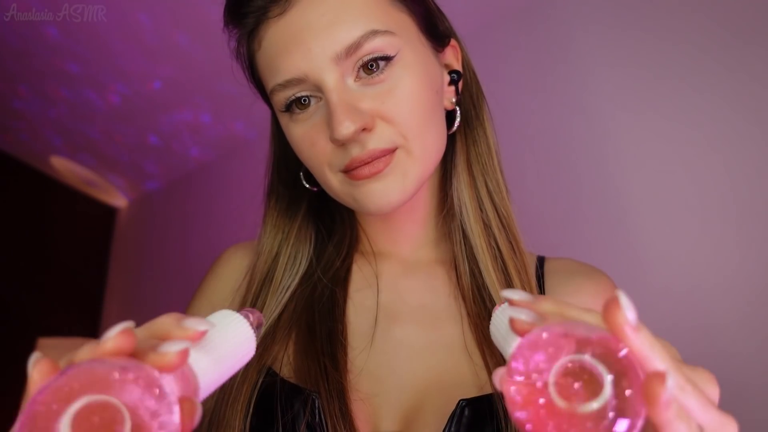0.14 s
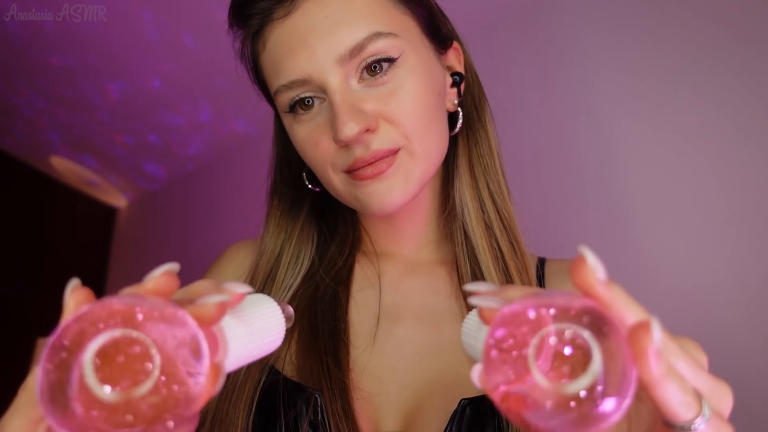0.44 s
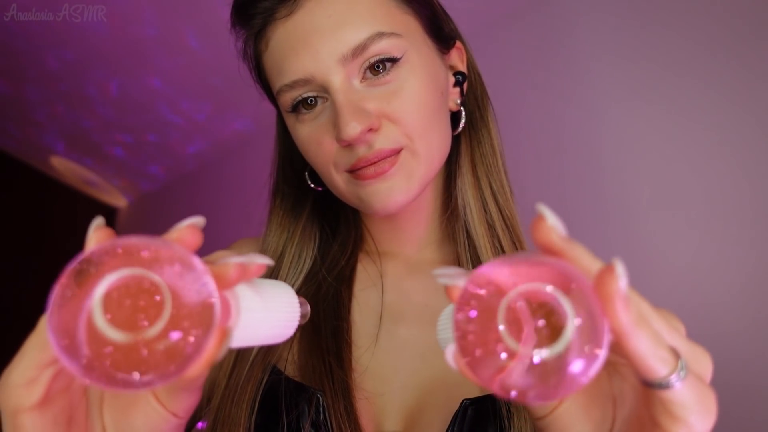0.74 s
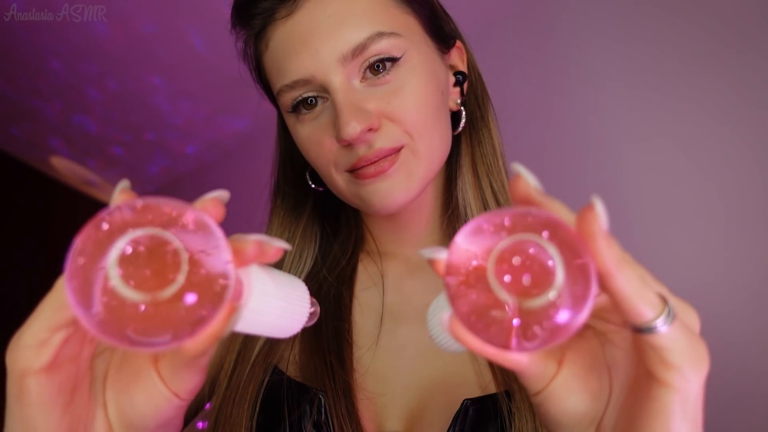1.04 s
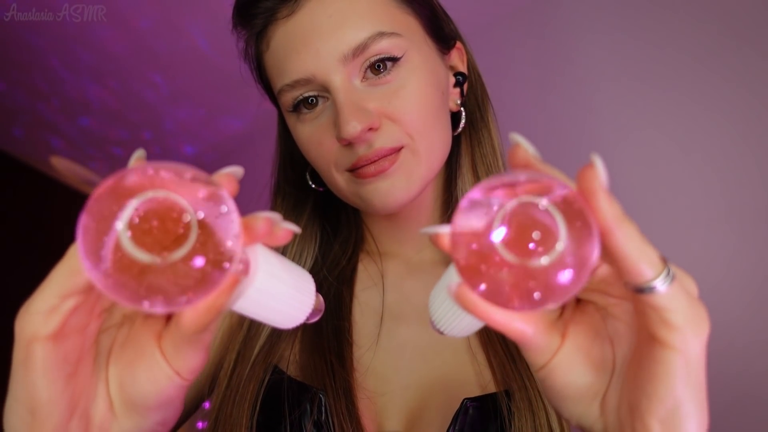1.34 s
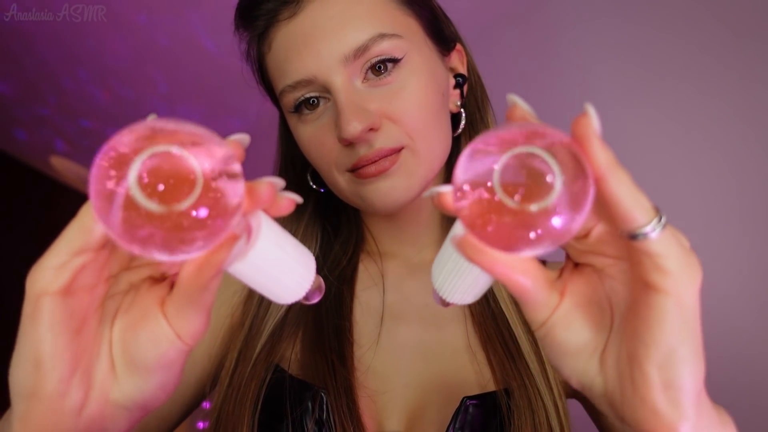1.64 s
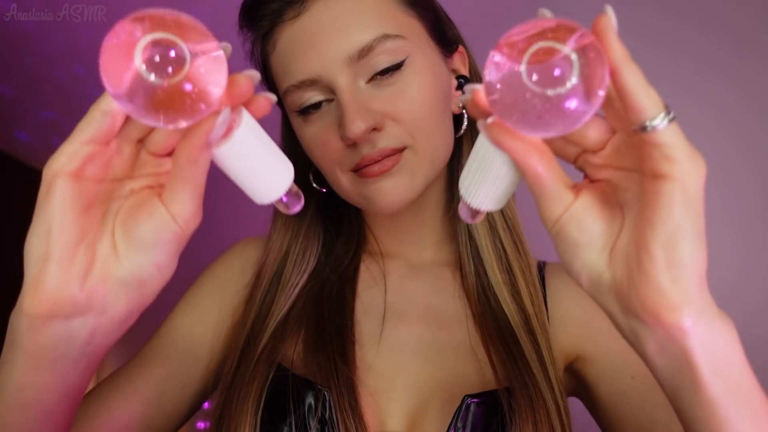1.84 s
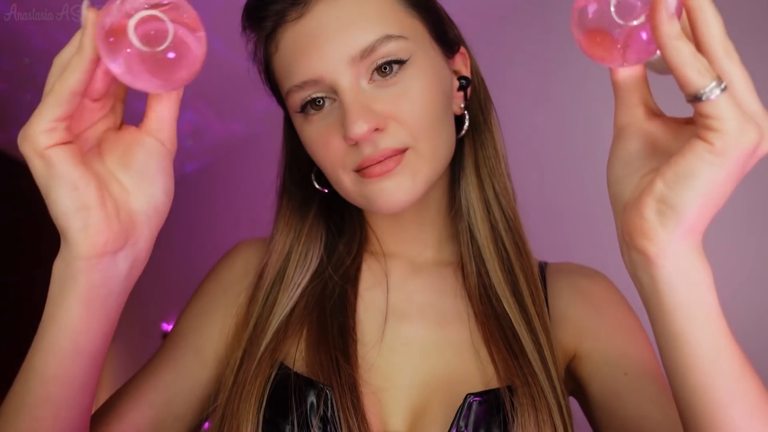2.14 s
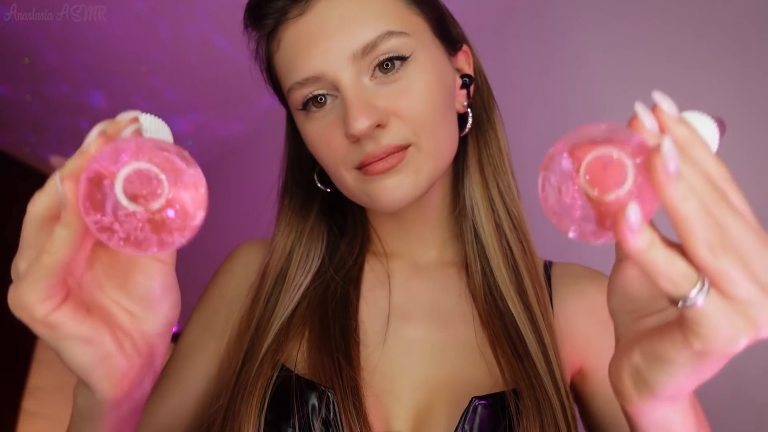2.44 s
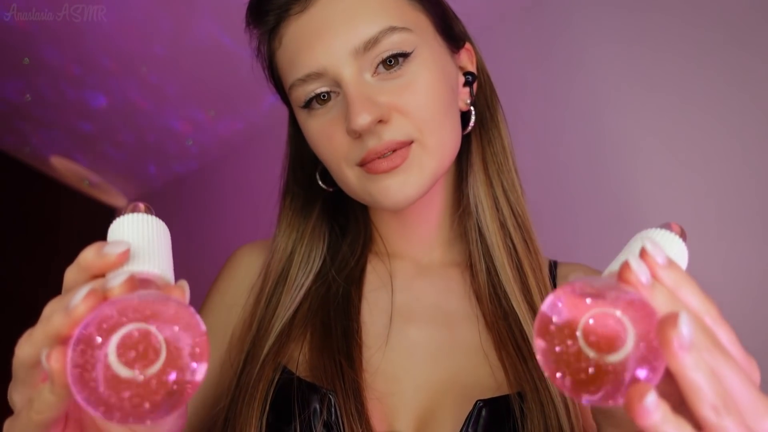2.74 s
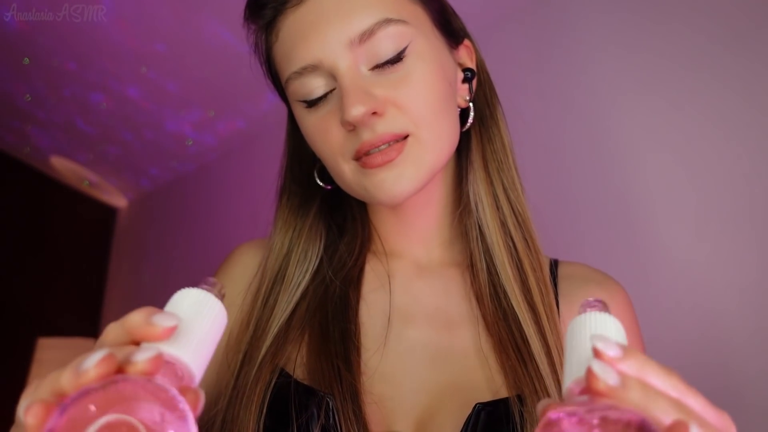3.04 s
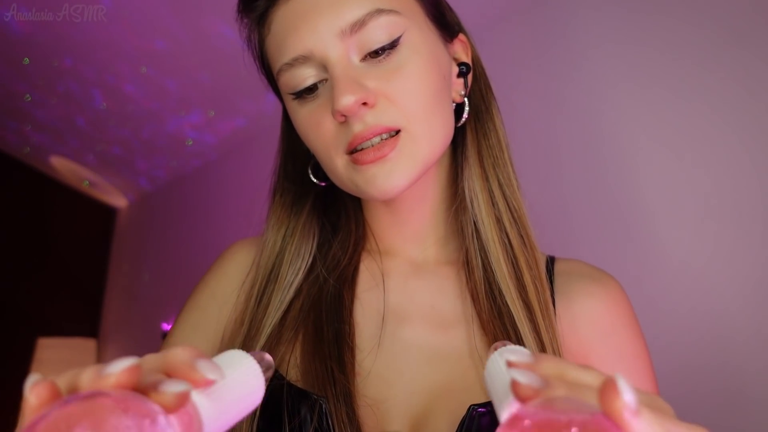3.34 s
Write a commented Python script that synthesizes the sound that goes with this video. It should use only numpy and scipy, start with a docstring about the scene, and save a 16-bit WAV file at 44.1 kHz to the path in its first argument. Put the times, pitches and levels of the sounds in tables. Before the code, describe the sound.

Close to a stereo microphone in a quiet room, liquid in two handheld glass globes gives a few quick gulps, then a brief bubbly trickle. Light finger ticks and taps come before and after, over a low rumble and faint hum.

```python
"""Four glugs, then small plinking bubbles, from two liquid-filled glass globes tipped and turned back.
Each gulp of air through a neck rings a large pocket and a smaller one that chirps upward.
Fingers tick, tap and rub on the glass, close to a stereo microphone in a quiet room.
Moving arms stir a deep rumble over mains hum and hiss; a faint tone wavers near the end."""
import sys
import numpy as np
from scipy import signal
from scipy.fft import rfft, irfft, next_fast_len
from scipy.io import wavfile
from scipy.ndimage import map_coordinates

SR = 44100
rng = np.random.default_rng(int(sys.argv[2]) if len(sys.argv) > 2 else 0)


def generate_wav(sig):
    """Save sig (samples, or channels by samples) to the path in sys.argv[1] as 16-bit PCM at SR."""
    pcm = np.round(np.clip(np.atleast_2d(sig).T, -1, 1) * 32767).astype(np.int16)
    wavfile.write(sys.argv[1], SR, pcm)


N = 154350

# spectrum of skin on glass (frequency [Hz], gain [dB])
SKIN_SPECTRUM = [(1000, -40), (5000, -20), (8000, -9.5), (10500, -2.5), (15000, -3), (17000, -17)]
BUBBLE_ATTACK_S, BUBBLE_WET_DB = 0.00024, -8


def amp(db):
    """Decibels to gain."""
    return 10 ** (np.asarray(db) / 20)


def along(points, hz):
    """Interpolate (Hz, value) points on a log axis."""
    knots_hz, values = np.transpose(points)
    return np.interp(np.log(hz + 1), np.log(knots_hz + 1), values)


def unit(x):
    """Scale to rms 1."""
    return x / np.sqrt(np.mean(x ** 2) + 1e-20)


def curves(rows):
    """Per-sample curve for each column after the time."""
    times_s, *columns = np.transpose(rows)
    return [np.interp(np.arange(N) / SR, times_s, column) for column in columns]


def wobble(rate_hz):
    """Smooth random curve, rate_hz knots per second."""
    knots = rng.standard_normal(int(N * rate_hz / SR) + 4)
    return map_coordinates(knots, [np.arange(N) * rate_hz / SR])


def filtered(x, response):
    """Zero-phase filter with gain response(hz)."""
    size = next_fast_len(N + SR // 2)
    return irfft(rfft(x, size) * response(np.fft.rfftfreq(size, 1 / SR)), size)[..., :N]


def noise(spectrum, coherence=None):
    """Coloured stereo noise, rms 1; sides independent by default."""
    def mid_side_gains(hz):
        angle = np.arccos(np.clip(along(coherence, hz), -1, 1) if coherence else 0 * hz) / 2
        return amp(along(spectrum, hz)) * [np.cos(angle), np.sin(angle)]
    mid, side = filtered(rng.standard_normal((2, N)), mid_side_gains)
    return unit(np.array([mid + side, mid - side]))


def fade(t, t60_s):
    """Exponential decay, 60 dB in t60_s."""
    return 1000 ** (-t / t60_s)


def ring(t, hz, t60_s, attack_s):
    """Damped sine; pitch may glide."""
    phase = 2 * np.pi * np.cumsum(hz + 0 * t) / SR
    return np.sin(phase) * fade(t, t60_s) * (1 - np.exp(-t / attack_s))


def add(out, start_s, sound, pan_db):
    """Mix in at start_s; pan_db is left minus right."""
    part = out[:, round(start_s * SR):][:, :sound.shape[-1]]
    part += (sound * amp([[pan_db / 2], [-pan_db / 2]]))[:, :part.shape[1]]


def in_room(x, wet_db, onset_s=0.0064):
    """Direct sound plus the short tail of a furnished room."""
    # room decay (frequency [Hz], t60 [s])
    decay = [(200, 0.27), (1000, 0.29), (3000, .27), (8000, 0.26), (15000, 0.23)]
    hz, t, spectra = signal.stft(rng.standard_normal((2, SR // 2)), SR, nperseg=256)
    tail = signal.istft(spectra * fade(t, along(decay, hz)[:, None]), SR, nperseg=256)[1]
    tail *= 1 - np.exp(-(np.arange(tail.shape[1]) / SR / onset_s) ** 2)
    tail /= np.linalg.norm(tail[0])
    return x + amp(wet_db) * signal.fftconvolve(x.mean(0)[None], tail, axes=1)[:, :N]


def glugs(pocket_double_s=0.098, attack_s=0.0014, neck_t60_s=0.24, neck_top_hz=1220):
    """A big air pocket rings and rises in pitch; one in the neck chirps up as it closes."""
    # air gulps (time [s], pitch [Hz], level [dB], t60 [s], L-R [dB],
    # neck pitch [Hz], neck level [dB], neck pitch doubling [s], neck closure [s])
    gulps = [(1.3197, 221.5, -29.5, 0.2, -8.5, 441, -42.5, 0.026, 0.022),
             (1.3655, 162.3, -34.5, 0.2, 8.5, 495, -40.5, .03, 0.0082),
             (1.4955, 202, -31.5, 0.2, 5.5, 420.5, -39, 0.044, 0.055),
             (1.6090, 349.6, -26.5, 0.12, 4.5, 433, -38.5, 0.044, .054)]
    out, t = np.zeros((2, N)), np.arange(SR // 5) / SR
    for start_s, hz, db, t60_s, pan_db, neck_hz, neck_db, double_s, close_s in gulps:
        pocket = ring(t, hz * (1 + (t / pocket_double_s) ** 2), t60_s, attack_s)
        # capped at the smallest pocket the neck holds
        chirp_hz = np.minimum(neck_hz * (1 + (t / double_s) ** 3), neck_top_hz)
        neck = ring(t, chirp_hz, neck_t60_s, attack_s) * np.exp(-(t / close_s) ** 20)
        add(out, start_s, amp(db) * pocket + amp(neck_db) * neck, pan_db)
    return in_room(out, wet_db=-17)


def bubbles(rise_per_s=1, lag_s_per_db=0.000016):
    """Small bubbles plink, rise slightly in pitch and reach the nearer side first."""
    # ringing bubbles (time [s], pitch [Hz], level [dB], t60 [s], L-R [dB])
    plinks = [(1.4251, 1134, -34.5, 0.029, -6), (1.4248, 3360, -35, 0.012, -12.5),
              (1.4256, 4250, -33, 0.0072, -5), (1.61, 3110, -52, 0.032, 12.5),
              (2.329, 3025, -38.5, 0.037, 13.5), (2.3783, 1615, -28.5, 0.044, 4),
              (2.3795, 1850, -30, 0.027, 10), (2.3785, 2210, -38, 0.022, 17),
              (2.3782, 893, -42.5, 0.045, 5.5), (2.4471, 874.5, -29, 0.061, 0),
              (2.4466, 1215, -23, 0.026, 4.5), (2.449, 2626, -30, 0.022, 4), (2.446, 3050, -31, .025, 11),
              (2.507, 1134, -39, 0.031, 4), (2.5131, 3070, -35, 0.02, 12), (2.520, 1020, -41.5, 0.037, 7),
              (2.5406, 1342, -37.5, 0.043, -3), (2.5389, 1970, -36.5, 0.0094, -15),
              (2.565, 1800, -37.5, 0.0089, 2), (2.602, 3286, -36.5, 0.019, -14.5)]
    out, t = np.zeros((2, N)), np.arange(SR // 10) / SR
    for start_s, hz, db, t60_s, pan_db in plinks:
        lag_s = lag_s_per_db * np.maximum([[-pan_db], [pan_db]], 0)
        age_s = np.maximum(t - lag_s, 0)
        tone = np.sin(2 * np.pi * hz * age_s * (1 + rise_per_s * age_s / 2))
        envelope = fade(age_s, t60_s) * (1 - np.exp(-age_s / BUBBLE_ATTACK_S))
        add(out, start_s, amp(db) * tone * envelope, pan_db)
    return in_room(out, BUBBLE_WET_DB)


def froth(count=90, start_s=2.37, length_s=0.2, centre_hz=1700, spread_oct=0.98, db=-49.5, t60_s=0.009):
    """Tiny short-lived bubbles splutter as the liquid runs back."""
    out, t = np.zeros((2, N)), np.arange(SR // 30) / SR
    for when, pitch, strength, side in rng.random((count, 4)):
        hz = centre_hz * 2 ** (spread_oct * (2 * pitch - 1))
        plink = amp(db) * (0.5 + strength) * ring(t, hz, t60_s, BUBBLE_ATTACK_S)
        add(out, start_s + when * length_s, plink, pan_db=20 * (side - 0.5))
    return in_room(out, BUBBLE_WET_DB)


def ticks(snap_db=22, snap_s=0.00093, scatter_db=-5.5, scatter_t60_s=0.0087):
    """Fingertip ticks: a few very high cycles, then brief scatter from hands and glass."""
    # fingertip contacts (time [s], pitch [Hz], relative level [dB], snap L-R [dB])
    contacts = [(.016, 13000, -36, -1), (.062, 13500, -40, 3), (0.1203, 13000, -37.5, 8),
                (0.1824, 13100, -32.5, 28), (.2820, 12700, -52, 3), (0.299, 12000, -39, -3),
                (.3120, 14300, -27, 13), (0.317, 13000, -34, 11), (.5090, 14200, -28, 11),
                (0.565, 12000, -39, 3), (0.5894, 10000, -31.5, 10), (0.6314, 11900, -40, 10),
                (0.6497, 14600, -27, -7), (0.8752, 11600, -35.5, 0), (1.0597, 11400, -38, 8),
                (1.1205, 11500, -29, 6), (1.1455, 11500, -40, 8), (1.4266, 13800, -27, -4),
                (1.4261, 9450, -27, -7), (1.4453, 12100, -36, -8), (1.5950, 10900, -30, 13),
                (1.7622, 11000, -41.5, 25), (1.9265, 10500, -37.5, -18), (2.225, 15000, -37, 2),
                (2.329, 6000, -37, 3), (2.36, 6960, -29, 4), (2.368, 6460, -29, 4),
                (2.445, 14300, -25, -24), (2.447, 9600, -28, 7), (2.4494, 13800, -27, 11),
                (2.4665, 13100, -51, -10), (2.5109, 11700, -32, 10), (2.5778, 14600, -35, 14),
                (2.8007, 9900, -31, -4), (2.9175, 14000, -40.5, 10), (2.9783, 13200, -34, 0),
                (3.2052, 11650, -37.5, 3), (3.2364, 14300, -38, -17), (3.3460, 13000, -41, 22),
                (3.3729, 13700, -32.5, -8)]
    out, t = np.zeros((2, N)), np.arange(SR // 50) / SR
    for start_s, hz, db, pan_db in contacts:
        snap = ring(t, hz, t60_s=snap_s, attack_s=snap_s)
        scatter = fade(t, scatter_t60_s) * rng.standard_normal((2, len(t)))
        add(out, start_s, amp(db + snap_db) * snap, pan_db)
        add(out, start_s, amp(db + scatter_db) * scatter, pan_db / 2)
    return in_room(filtered(out, lambda hz: amp(along(SKIN_SPECTRUM, hz))), wet_db=-6)


def taps():
    """Light knocks on the glass, damped by the hand."""
    # glass knocks (time [s], pitch [Hz], level [dB], t60 [s], L-R [dB])
    knocks = [(2.8003, 3980, -22, 0.0011, -3), (3.0690, 1120, -33.5, 0.016, 10.5),
              (3.0690, 350, -37, 0.02, 7.5), (3.2055, 3200, -27.5, 0.0051, -3.5)]
    out, t = np.zeros((2, N)), np.arange(SR // 20) / SR
    for start_s, hz, db, t60_s, pan_db in knocks:
        add(out, start_s, amp(db) * ring(t, hz, t60_s, attack_s=0.00008), pan_db)
    return in_room(out, wet_db=-10)


def crackle(grains_per_s=900, spread_db=13, expansion=1.9, gain_db=0.5):
    """Skin crackles on the glass in fine random impulses."""
    # crackle contour (time [s], level before expansion and gain [dB])
    contour = [(0.0, -65.5), (0.21, -71), (0.32, -69.5), (1.45, -71), (1.73, -71), (2.16, -65),
               (2.37, -69.5), (2.44, -71), (2.58, -85), (2.83, -72), (2.94, -71), (3.5, -69)]
    contour_db, = curves(contour)
    level_db = gain_db + contour_db.mean() + expansion * (contour_db - contour_db.mean())
    grains = (rng.random((2, N)) < grains_per_s / SR) * rng.standard_normal((2, N))
    grains *= amp(spread_db * np.clip(rng.standard_normal((2, N)), -1, 1))
    return amp(level_db) * unit(filtered(grains, lambda hz: amp(along(SKIN_SPECTRUM, hz))))


def rubs(roughness_db=3.9):
    """Fingers slide as the grip changes: swells of rough noise."""
    # finger slides (peak time [s], level [dB], rise [s], fall [s])
    slides = [(1.95, -67.5, 0.097, .06), (2.142, -51.5, 0.0086, 0.036), (2.331, -55, 0.066, 0.043),
              (2.368, -50.5, 0.0081, .016), (2.46, -62.5, 0.03, 0.1)]
    # friction spectrum (frequency [Hz], gain [dB])
    spectrum = [(300, -23), (1500, -1.5), (3000, -1.5), (6000, 4), (8000, -1), (11500, 3), (15000, -7)]
    t = np.arange(N) / SR
    envelope = sum(amp(db) * np.exp(-np.abs(t - peak_s) / np.where(t < peak_s, rise_s, fall_s))
                   for peak_s, db, rise_s, fall_s in slides)
    return envelope * amp(roughness_db * wobble(rate_hz=250)) * noise(spectrum)


def thumps_and_hum_swell():
    """Three soft low thumps, then the 226 Hz hum swells briefly near 3 s."""
    # low damped tones: three thumps, two for the swell (time [s], pitch [Hz], level [dB])
    low_tones = [(2.666, 253, -54), (2.865, 161, -51), (2.915, 197, -52), (3.01, 232, -52),
                 (3.08, 227, -51)]
    out, t = np.zeros((2, N)), np.arange(SR // 5) / SR
    for start_s, hz, db in low_tones:
        add(out, start_s, amp(db) * ring(t, hz, t60_s=0.18, attack_s=0.0093), pan_db=0)
    return out


def faint_tone():
    """A thin sine wavers as the globes are lowered."""
    # tone path (time [s], pitch [Hz], rms level [dB])
    path = [(2.80, 425, -95), (2.85, 416, -68), (2.91, 396, -76), (2.98, 420, -81), (3.12, 482, -71),
            (3.23, 440.4, -68.5), (3.285, 505.4, -71.5), (3.38, 442, -67.5), (3.47, 399, -78)]
    hz, db = curves(path)
    sounding = np.arange(N) / SR > path[0][0]
    return sounding * amp(db) * np.sqrt(2) * np.sin(2 * np.pi * np.cumsum(hz) / SR)


def rumble(gain_db=1):
    """Air stirred by moving arms, the same on both sides."""
    # air motion (time [s], relative level [dB])
    contour = [(0.0, -49), (0.04, -43), (1.0, -37.5), (1.73, -38.5), (2.1, -34.5), (2.13, -36),
               (2.35, -31.5), (2.53, -41.5), (2.69, -32), (2.84, -47), (3.26, -40), (3.5, -48.5)]
    # rumble spectrum (frequency [Hz], gain [dB])
    spectrum = [(1, 1.5), (4, 2.5), (8, 1), (14, -8), (25, -14), (40, -29), (70, -31.5), (120, -74),
                (400, -110)]
    contour_db, = curves(contour)
    return amp(contour_db + gain_db) * noise(spectrum, coherence=[(20, 1.0)])


def hum(flutter_db=3.1, jitter_rad=0.51):
    """Mains hum; each partial wanders in level and phase."""
    # hum partials (frequency [Hz], rms level [dB])
    partials = [(50, -56), (150.3, -74), (226, -76), (1373, -87.5)]
    out, t = np.zeros(N), np.arange(N) / SR
    for hz, db in partials:
        envelope = np.sqrt(2) * amp(db + flutter_db * wobble(rate_hz=4.82))
        out += envelope * np.sin(2 * np.pi * hz * t + jitter_rad * wobble(rate_hz=6.52))
    return out


def noise_floor(room_db=-62.5, hiss_db=-65):
    """Room noise, coherent in the bass, plus microphone hiss."""
    # room noise spectrum (frequency [Hz], gain [dB])
    room_spectrum = [(20, -18.5), (60, 11), (100, -1), (160, -4), (230, -3.5), (320, -7), (640, -9.5),
                     (900, -16), (2000, -16.5), (5000, -24.5), (16000, -51)]
    # room noise likeness (frequency [Hz], L-R coherence [0..1])
    coherence = [(30, 0.77), (80, 1), (150, 0.89), (400, 0.78), (1000, 0.36), (3000, 0.033)]
    # hiss spectrum (frequency [Hz], gain [dB])
    hiss_spectrum = [(100, -20), (1000, -3), (4000, -0.5), (9000, -1.5), (15000, -3)]
    return amp(room_db) * noise(room_spectrum, coherence) + amp(hiss_db) * noise(hiss_spectrum)


def scene():
    """Liquid, handling and background."""
    liquid = glugs() + bubbles()
    handling = taps() + ticks() + crackle() + rubs()
    background = thumps_and_hum_swell() + faint_tone() + rumble() + hum() + noise_floor()
    return liquid + froth() + handling + background


def record(dry, cutoff_hz=16200):
    """Recorder band limit: steep low-pass."""
    return filtered(dry, lambda hz: 1 / np.sqrt(1 + (hz / cutoff_hz) ** 120))


dry = scene()
out = record(dry)
generate_wav(out)
```